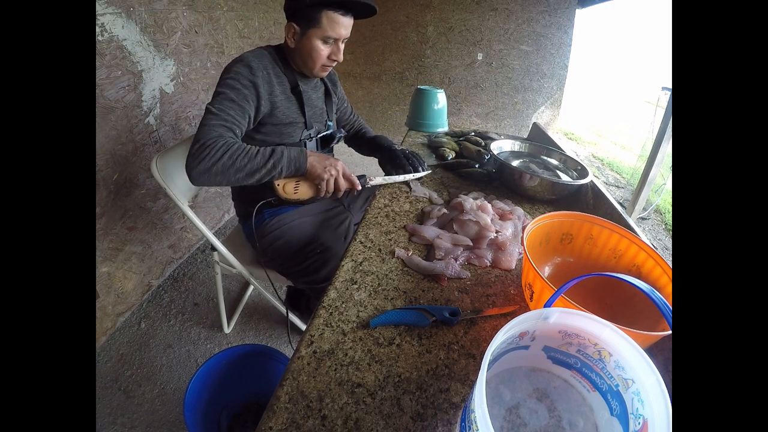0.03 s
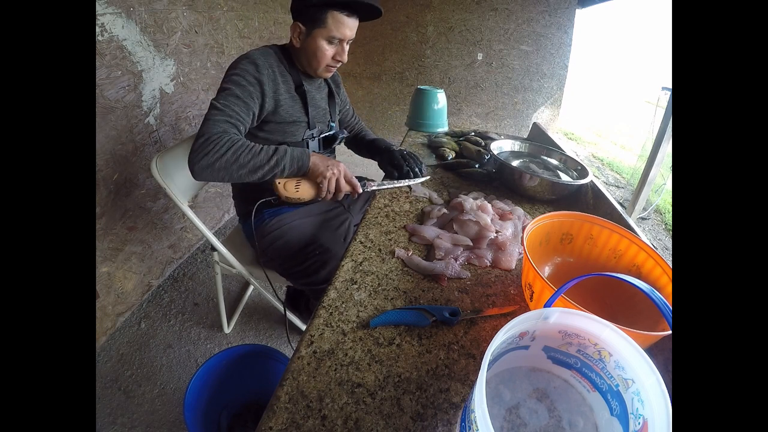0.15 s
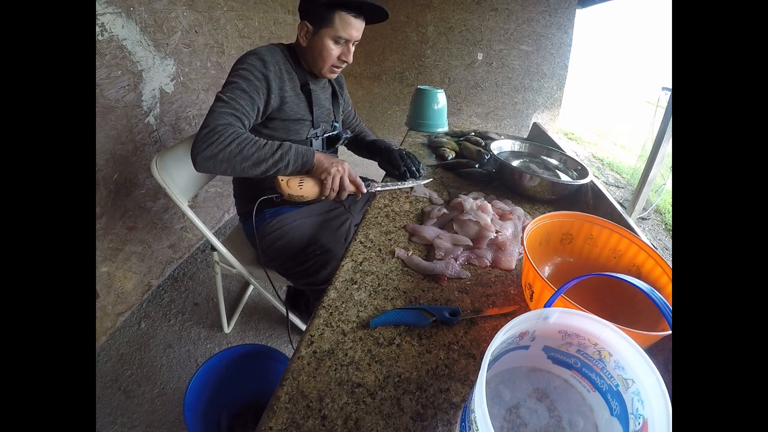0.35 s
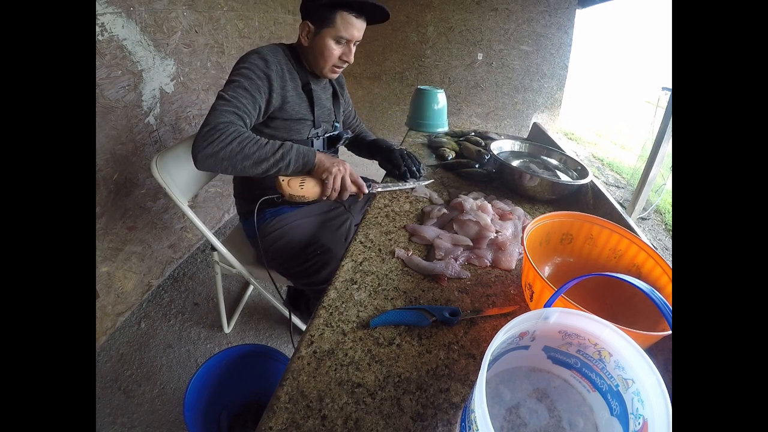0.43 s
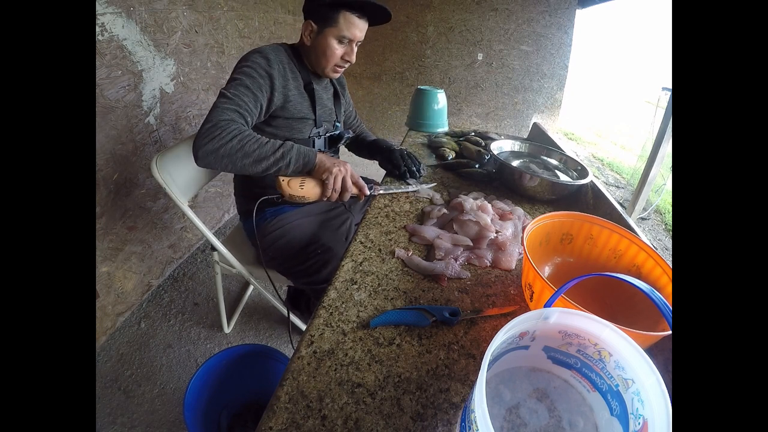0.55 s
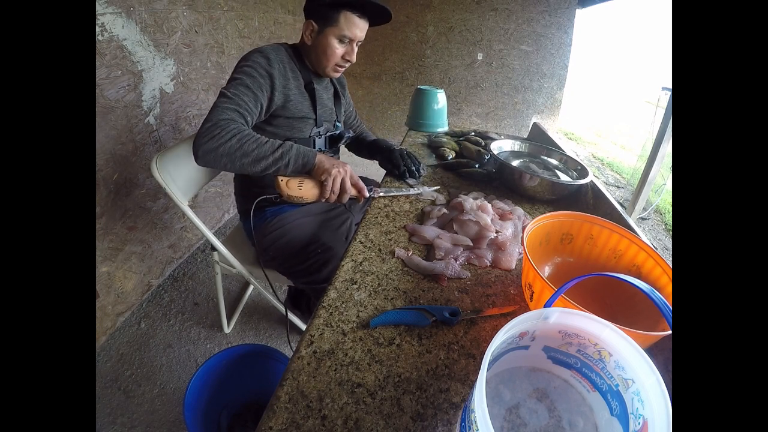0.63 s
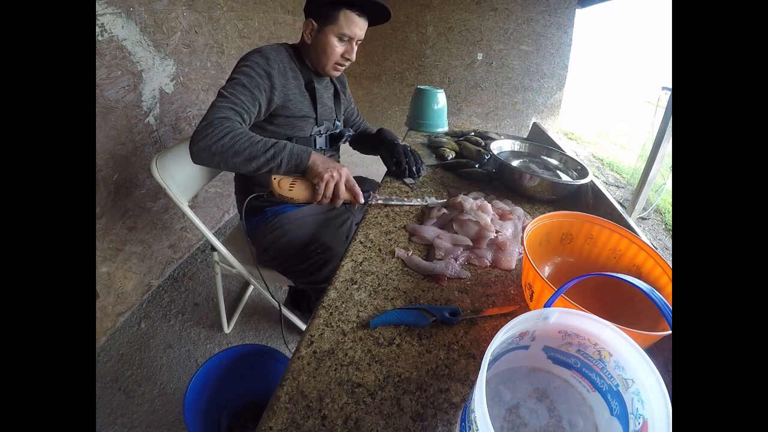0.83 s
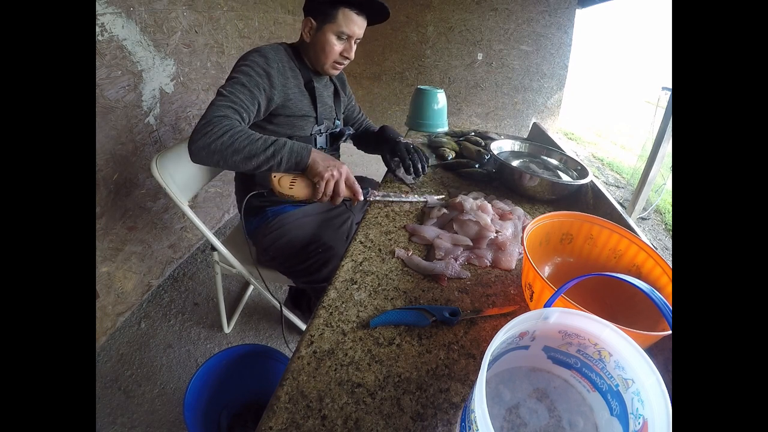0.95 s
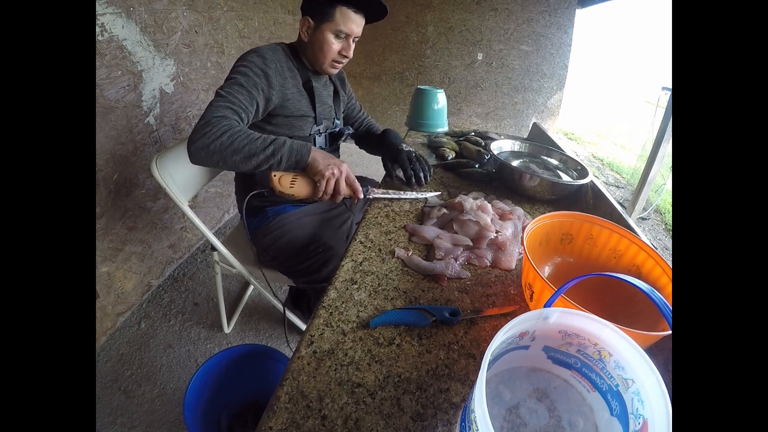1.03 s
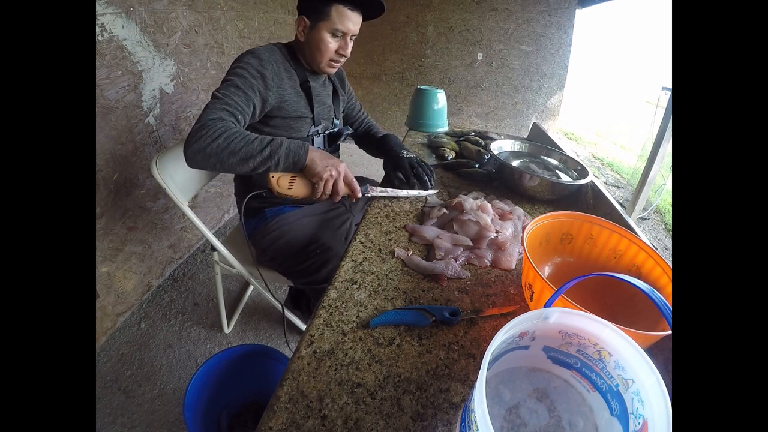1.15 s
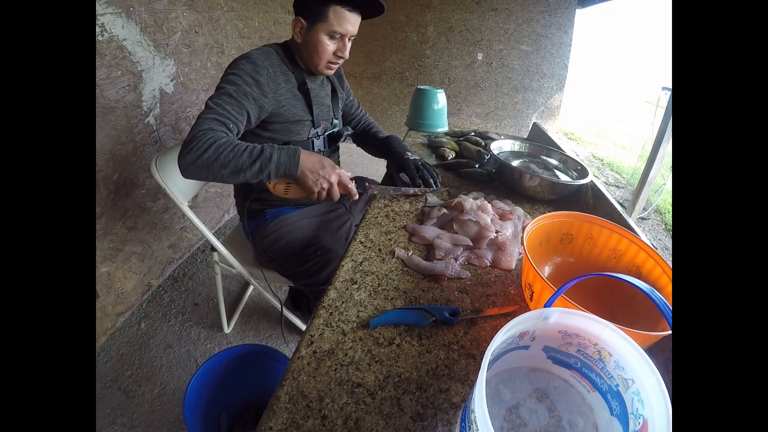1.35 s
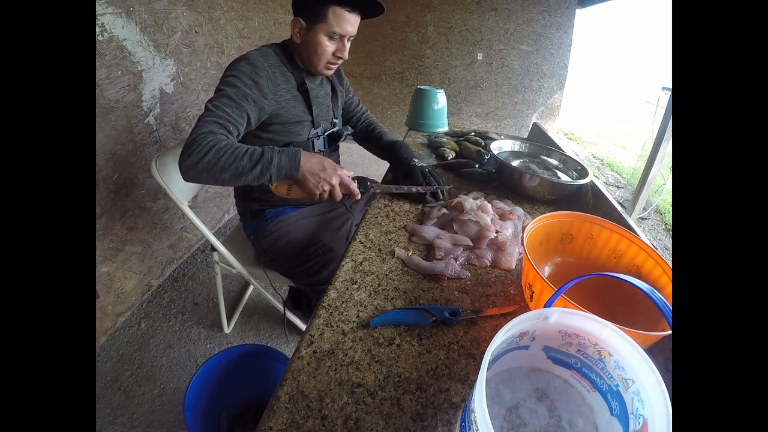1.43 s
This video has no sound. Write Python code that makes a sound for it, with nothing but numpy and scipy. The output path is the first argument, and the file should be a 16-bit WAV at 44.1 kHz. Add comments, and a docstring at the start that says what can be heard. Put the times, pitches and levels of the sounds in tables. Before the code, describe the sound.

Close to the microphones on a porch table, an electric carving knife switches on and saws with a low buzz, a gear whine and a rapid metallic rasp, then slows. Faint high chirps at the start and quiet outdoor air sit behind.

```python
"""Electric carving knife on a porch

A stereo pair of microphones at a porch table. Close by, the knife is switched on, saws for a second
and coasts down: its gear whines, its twin blades rasp and clack on every stroke, and its shaking
reaches the microphones through the table. Behind it are faint outdoor air, thin high chirps
echoing under the roof, and a soft regular low thump, probably electrical interference."""
import sys
import numpy as np
from scipy import signal
from scipy.io import wavfile
from scipy.ndimage import uniform_filter1d, minimum_filter1d

SR = 44100
rng = np.random.default_rng(int(sys.argv[2]) if len(sys.argv) > 2 else 0)


def persist_wave(psi):
    """Save psi, clipped to +-1, as 16-bit WAV."""
    counts = np.round(np.clip(psi, -1, 1) * 32767).astype(np.int16)
    wavfile.write(sys.argv[1], SR, np.atleast_2d(counts).T)


N = 66150
TIME = np.arange(N) / SR
CUTOFF_HZ = 15700


def from_db(db):
    """Decibels to gain."""
    return 10 ** (np.asarray(db) / 20)


def unit_rms(x):
    """Scale to an rms of 1."""
    return x / np.sqrt(np.mean(x ** 2) + 1e-20)


def over_time(rows):
    """Each column of a curve, at every sample."""
    times, *columns = np.transpose(rows)
    return [np.interp(TIME, times, column) for column in columns]


def at_hz(rows, hz):
    """Each column of a spectrum, read at a frequency."""
    points, *columns = np.transpose(rows)
    return np.array([np.interp(np.log(hz), np.log(points), column) for column in columns])


def pan(left_over_right_db):
    """Gains at the left and right microphones."""
    return from_db(np.array([[left_over_right_db], [-left_over_right_db]]) / 2)


def drift(hz):
    """Smooth random wandering with an rms of 1."""
    pole = np.exp(-2 * np.pi * hz / SR)
    return unit_rms(signal.lfilter([1], [1, -2 * pole, pole * pole], rng.standard_normal(2 * N))[N:])


def band(x, low_hz, high_hz):
    """Butterworth band-pass."""
    return signal.sosfilt(signal.butter(2, [low_hz, high_hz], "band", fs=SR, output="sos"), x)


def banded_noise(white, spectrum, correlation, flicker_db, tilt_db_per_octave=0):
    """Shape two noise pairs into flickering third-octave bands, each with its own stereo width."""
    edges = 2 ** np.arange(np.log2(spectrum[0][0] / np.sqrt(2)), np.log2(CUTOFF_HZ), 1 / 3)
    total = 0
    for k, (low, high) in enumerate(zip(edges, edges[1:])):
        mid, side = band(white[k % 2], low, high)
        hz = np.sqrt(low * high)
        alike = np.clip(at_hz(correlation, hz), -1, 1)
        stereo = np.sqrt(1 + alike) * mid + np.sqrt(1 - alike) * side * [[1], [-1]]
        level_db = at_hz(spectrum, hz)[:, None] + flicker_db * drift(30)
        total = total + from_db(level_db + tilt_db_per_octave * np.log2(hz / 4000)) * stereo
    return unit_rms(total)


def partial(cycles, level_db, wobble_db, wander_rad, drift_hz):
    """A slightly unsteady sine locked to the mechanism."""
    amplitude = np.sqrt(2) * from_db(level_db + wobble_db * drift(drift_hz))
    return amplitude * np.sin(2 * np.pi * cycles + wander_rad * drift(drift_hz))


# Relative spectrum of the air around the porch: frequency_hz, left_db, right_db
AIR_SPECTRUM = [(43.8, -0.5, 2.5), (126, -0.5, -8.5), (290, -17, -21.5), (700.0, -25.0, -23.5),
                (1480, -26, -26.5), (3000.0, -33, -31), (4450, -32, -31), (6300, -35, -19.5),
                (7770, -47, -27.5), (9400, -31, -34), (11100, -57, -78), (15000.0, -94, -77)]


def outdoor_air():
    """Faint open air, almost unrelated at the two microphones."""
    correlation = [(50, 0), (500, 0), (3000, 0.065), (10000, 0.19)]  # frequency_hz, correlation
    white = rng.standard_normal((2, 2, N))
    return from_db(-38) * banded_noise(white, AIR_SPECTRUM, correlation, flicker_db=0.5)


# Notes in the background, off to the right: start_s, level_db
CHIRP_NOTES = [(-.03, -36), (.032, -46.5), (0.094, -42.5), (0.154, -44), (0.216, -44.5)]


def chirps(note_s=0.0248, top_hz=8010, fall_hz=940, porch_t60_s=.3):
    """A quick trill of thin notes that hold and then drop, echoing under the porch roof."""
    lead = N // 10  # the trill is already under way
    t = (np.arange(N + lead) - lead) / SR
    direct = 0
    for start_s, level_db in CHIRP_NOTES:
        progress = np.clip((t - start_s) / note_s, 0, 1)
        pitch_hz = top_hz - fall_hz * progress ** 4
        envelope = from_db(level_db) * np.sin(np.pi * progress)
        direct = direct + envelope * np.sin(2 * np.pi * np.cumsum(pitch_hz) / SR)
    porch = rng.standard_normal((2, N)) * from_db(-60 * TIME / porch_t60_s)
    porch /= np.sqrt((porch ** 2).sum(1, keepdims=True))
    echo = signal.fftconvolve(direct[None], porch)
    return pan(-17.5) * (direct[lead:] + from_db(-2) * echo[:, lead:lead + N])


def thumps(first_s=.0855, every_s=.1024, pitch_hz=49.7, t60_s=0.038):
    """A soft, regular low thump, alike in both channels: probably electrical interference."""
    age_s = (TIME - first_s) % every_s
    envelope = from_db(-16.5 - 60 * age_s / t60_s) * (TIME > first_s)
    return band(envelope * np.sin(2 * np.pi * pitch_hz * age_s), 12, 300)


ON_S, OFF_S = .174, 1.122
# Running speed of the knife under load: time_s, stroke_hz
LOADED_SPEED = [(.6, 69.3), (.76, 68.9), (.93, 69.72), (1.12, 70.02)]


def motor_speed(spin_up_s=.06, coast_s=.655):
    """Strokes a second: the motor runs up, holds its speed under load and coasts once switched off."""
    running_hz, = over_time(LOADED_SPEED)
    run_up = 1 - np.exp(-np.maximum(TIME - ON_S, 0) / spin_up_s)
    coast = np.exp(-np.maximum(TIME - OFF_S, 0) / coast_s)
    return running_hz * run_up * coast


# Table vibration at 1, 1.5, 2 and 3 times the stroke rate: time_s, stroke_db, bite_db, double_db, buzz_db
SHAKE_LEVELS = [(0.21, -32.0, -30.0, -32.0, -29.0), (0.235, -33.0, -30.0, -22.0, -19.0),
                (0.275, -31.0, -30.0, -9.0, -32.0), (0.33, -44.0, -31.0, -8.0, -12.0),
                (0.41, -25.0, -30.0, -14.0, -7.0), (0.55, -21.0, -32.0, -13.0, -12.0),
                (0.74, -21.0, -30.0, -13.0, -13.0), (0.79, -19.0, -26.0, -14.0, -17.0),
                (0.83, -21.0, -22.0, -22.0, -11.0), (0.865, -23.0, -18.0, -28.0, -23.0),
                (0.94, -22.0, -17.0, -21.0, -25.0), (1.0, -20.0, -13.0, -19.0, -27.0),
                (1.075, -23.0, -14.0, -19.0, -32.0), (1.11, -23.0, -25.0, -23.0, -31.0),
                (1.135, -25.0, -17.0, -14.0, -16.0), (1.17, -25.0, -24.0, -13.0, -26.0),
                (1.2, -23.0, -26.0, -21.0, -20.0), (1.26, -30.0, -30.0, -25.0, -38.0),
                (1.31, -35.0, -45.0, -40.0, -51.0)]
# Weaker tones that follow buzz_db: stroke_multiple, relative_db
BUZZ_TONES = [(2.5, -17), (4, -20), (4.5, -22), (5, -25), (6, -25)]
# Chatter of the biting blade, following bite_db: stroke_multiple, relative_db
CHATTER_TONES = [(1.75, -14), (2.75, -15), (3.5, -21), (4.5, -19)]
# The shake at the right microphone, compared with the left: frequency_hz, gain_db
RIGHT_MIC_RESPONSE = [(68, -7), (105, -7), (124, -7), (138, -2.6), (205, -7.5), (280, -3), (420, -2)]


def table_shake(strokes, stroke_hz, fade_db_per_s=350, right_lag_s=0.00021):
    """The knife rocks the microphones through the table; when the blade bites, successive strokes differ."""
    outside_s = np.maximum(SHAKE_LEVELS[0][0] - TIME, 0) + np.maximum(TIME - SHAKE_LEVELS[-1][0], 0)
    levels_db = np.array(over_time(SHAKE_LEVELS)) - fade_db_per_s * outside_s
    _, bite_db, _, buzz_db = levels_db
    tones = list(zip((1, 1.5, 2, 3), levels_db))
    tones += [(multiple, buzz_db + db) for multiple, db in BUZZ_TONES]
    tones += [(multiple, bite_db + db) for multiple, db in CHATTER_TONES]
    shake_rms = np.sqrt((from_db(levels_db) ** 2).sum(0))
    rattle = from_db(-20) * shake_rms * unit_rms(band(rng.standard_normal(N), 85, 290))
    left, right = rattle, from_db(-4) * rattle
    for multiple, level_db in tones:
        tone = partial(multiple * strokes, level_db, wobble_db=.6, wander_rad=.07, drift_hz=60)
        left = left + tone
        right = right + tone * from_db(at_hz(RIGHT_MIC_RESPONSE, multiple * stroke_hz + 1)[0])
    # The right microphone moves against the left, a moment later.
    return np.array([left, -np.interp(TIME - right_lag_s, TIME, right)])


# Whine of the gear, mesh tone to the left and octave to the right: time_s, mesh_db, octave_db
WHINE_LEVELS = [(.2, -58, -72), (.29, -42, -50), (.46, -41, -44), (.7, -43, -47.5), (.84, -40, -39),
                (.93, -38.5, -38.5), (1.02, -33, -37.5), (1.115, -34.5, -39.5), (1.13, -43, -48),
                (1.3, -45, -57), (1.5, -53, -58)]


def gear_whine(strokes, stroke_hz, teeth=36):
    """Meshing teeth give a tone and two overtones: clear at full speed, ragged as they run slack below it."""
    mesh_db, octave_db = over_time(WHINE_LEVELS)
    slack = np.tanh((1 - stroke_hz / stroke_hz.max()) / .04)
    wobble_db, wander_rad = 2 + 2.5 * slack, .2 + .55 * slack
    whine = 0
    for harmonic, db, pan_db in [(1, mesh_db, 5.5), (2, octave_db, -10.5), (3, octave_db - 13, -10.5)]:
        tone = partial(harmonic * teeth * strokes, db, wobble_db, wander_rad, drift_hz=53)
        whine = whine + pan(pan_db) * tone
    return whine * (TIME > ON_S)


def blade_friction(strokes, stroke_hz, repeating_share=0.32):
    """The same rough spots pass on every stroke, so part of the noise repeats and buzzes."""
    spots = int(SR / stroke_hz.max())
    surface = rng.standard_normal((2, 2, spots))[..., (strokes % 1 * spots).astype(int)]
    fresh = rng.standard_normal((2, 2, N))
    return np.sqrt(repeating_share) * surface + np.sqrt(1 - repeating_share) * fresh


def blade_clacks(strokes, stroke_hz, out_db=2.5, return_db=-2, scatter_db=1.6, decay_s=.0025):
    """The envelope of the clacks: one of uneven strength each time the blades reverse."""
    reversal, progress = np.divmod(2 * (strokes + 0.33), 1)
    reversal = reversal.astype(int)
    scatter = np.clip(rng.standard_normal(N), -2, 2)[reversal]
    strength_db = np.where(reversal % 2, return_db, out_db) + scatter_db * scatter
    age_s = progress / (2 * stroke_hz + 1)
    return from_db(strength_db) * np.exp(-age_s / decay_s) * (TIME > ON_S)


# Rasp of the blades, close by: time_s, level_db
RASP_LEVELS = [(.17, -78), (.21, -40), (.255, -31), (.3, -26), (.38, -27), (.6, -27), (.78, -28),
               (.95, -28), (1.14, -26.5), (1.22, -28), (1.32, -31.5), (1.38, -34.5), (1.44, -36),
               (1.46, -32.5), (1.5, -37.5)]
# Its relative spectrum at each microphone: frequency_hz, left_db, right_db
RASP_SPECTRUM = [(296.9, -2.5, -7.5), (480, -14, -5.5), (650, -17.5, -17), (1020, -13, -9.5),
                 (1520, -6.5, -10), (1850.0, -11.5, -15.5), (2320, -9, -13), (2860, -19, -17.5),
                 (3640, -13.5, -14), (4660, -16.5, -14.5), (5570, -18, -4.5), (7300, -16.5, -7),
                 (8540, -21.5, -21), (10230, -32.5, -25.5), (11700, -42, -44), (13300.0, -46.0, -43.0),
                 (15000.0, -90.0, -91.0)]
# How alike the two microphones hear it: frequency_hz, correlation
RASP_CORRELATION = [(300, -0.65), (600, 0.26), (1200, -0.23), (2100, -0.025), (4000, 1), (7000, -0.57),
                    (13000, 0.73)]


def blade_rasp(strokes, stroke_hz, grit_db=1, grit_hz=494):
    """Steel slides grittily on steel, surging at each clack and tilting slightly to the treble when slow."""
    clacks = blade_clacks(strokes, stroke_hz)
    contact = unit_rms(np.sqrt(1 + clacks ** 2) * from_db(grit_db * drift(grit_hz)))
    level_db, = over_time(RASP_LEVELS)
    slowness = 1 - stroke_hz / stroke_hz.max()
    rasp = banded_noise(blade_friction(strokes, stroke_hz), RASP_SPECTRUM, RASP_CORRELATION,
                        flicker_db=1.04, tilt_db_per_octave=0.5 * slowness)
    return from_db(level_db) * contact * rasp


# Moments when the blades catch, centred between the microphones: start_s, level_db
BLADE_CATCHES = [(0.731, -31.5), (1.167, -30.5), (1.198, -37), (1.222, -29), (1.321, -38)]


def blade_scrapes(rise_s=0.0019, band_hz=(3840, 4360)):
    """Each catch of the blades gives a brief burst of narrow, steely noise."""
    envelope = 0
    for start_s, level_db in BLADE_CATCHES:
        age = np.maximum(TIME - start_s, 0) / rise_s
        envelope = envelope + from_db(level_db) * age * np.exp(1 - age)
    return envelope * unit_rms(band(rng.standard_normal(N), *band_hz))


def scene():
    """The knife in front, the quiet of the porch behind."""
    background = outdoor_air() + chirps() + thumps()
    stroke_hz = motor_speed()
    strokes = np.cumsum(stroke_hz) / SR
    mechanism = table_shake(strokes, stroke_hz) + gear_whine(strokes, stroke_hz)
    blades = blade_rasp(strokes, stroke_hz) + blade_scrapes()
    return background + mechanism + blades


def record(dry):
    """After the microphones, a fast limiter holds down the peaks and the top treble is cut."""
    window = SR // 200  # 5 ms
    needed_gain = 1 / np.maximum(np.abs(dry).max(0), 1)
    gain = uniform_filter1d(minimum_filter1d(needed_gain, window), window)
    low_pass = signal.cheby2(12, 70, CUTOFF_HZ, fs=SR, output="sos")
    return signal.sosfilt(low_pass, gain * dry)


dry = scene()
out = record(dry)
persist_wave(out)
```